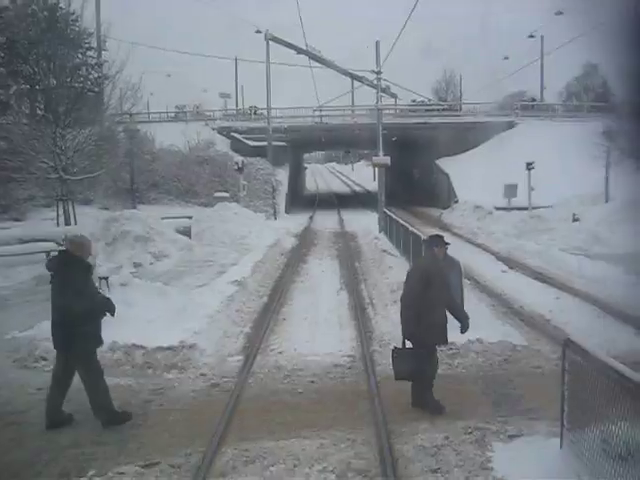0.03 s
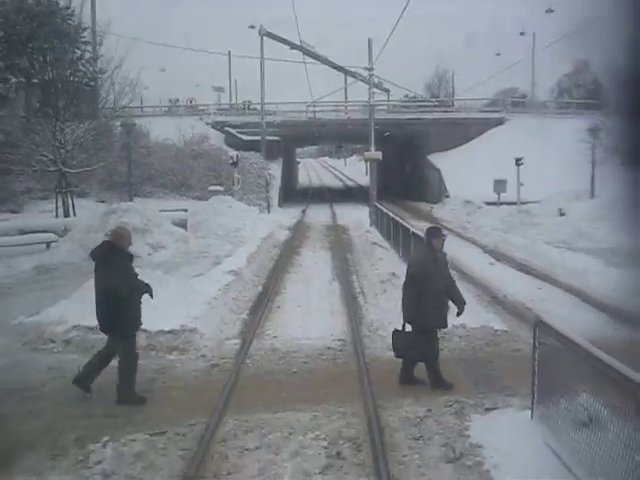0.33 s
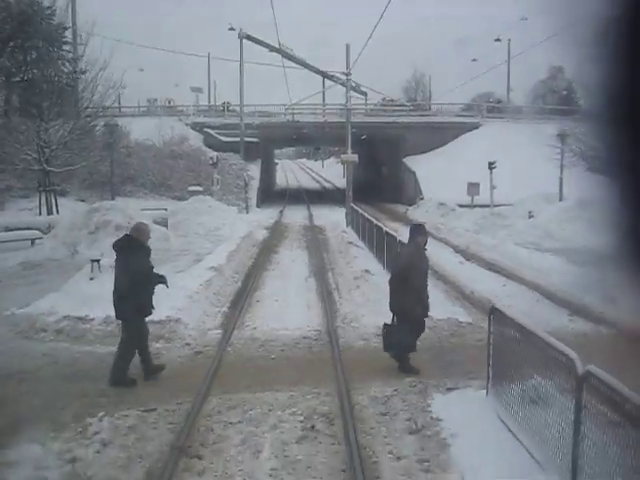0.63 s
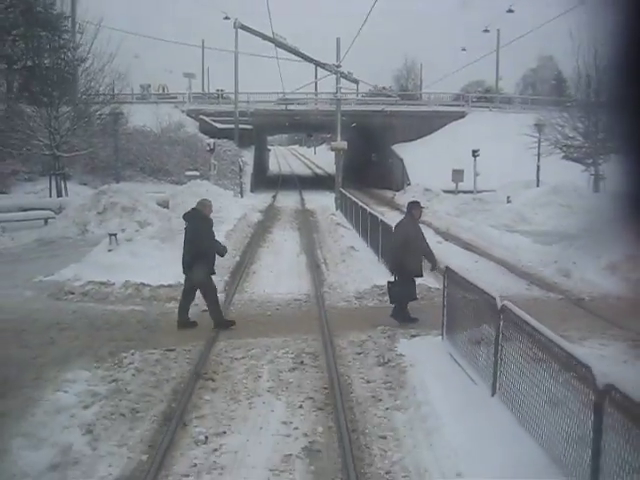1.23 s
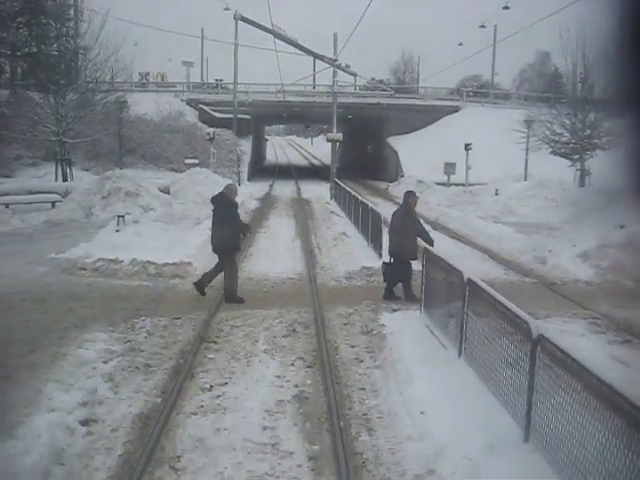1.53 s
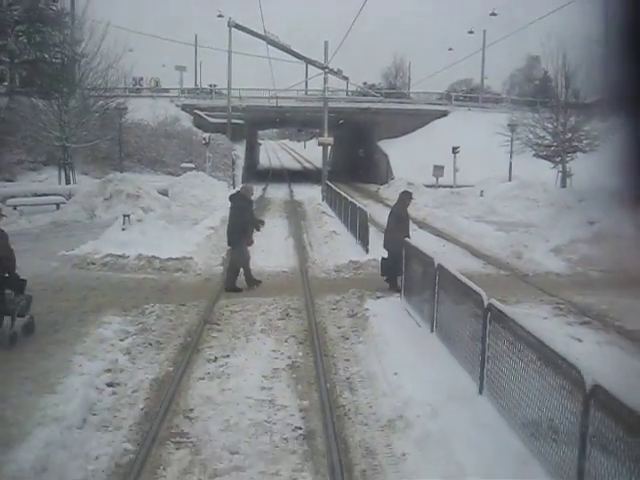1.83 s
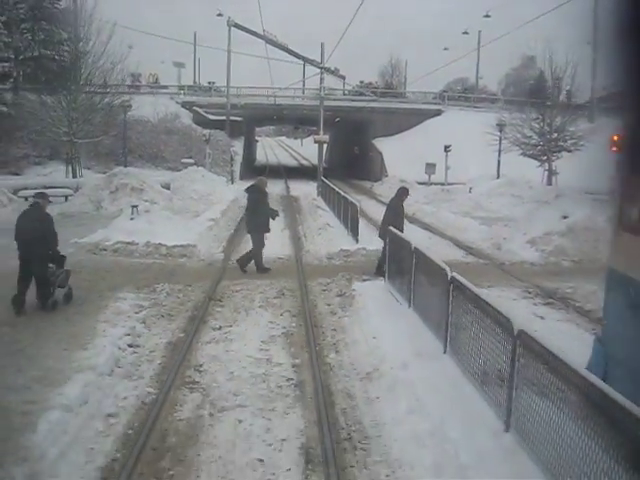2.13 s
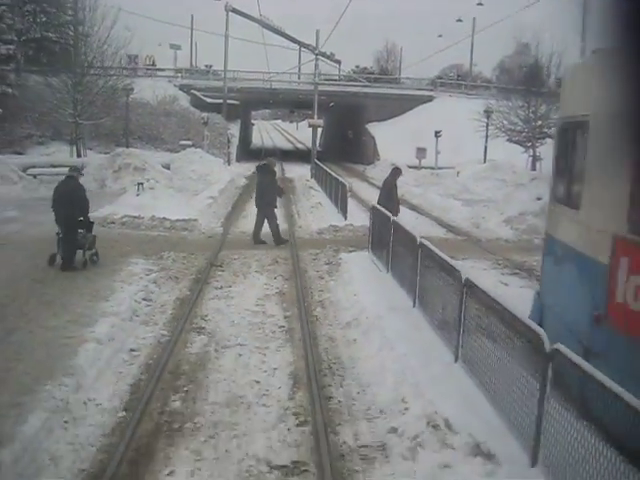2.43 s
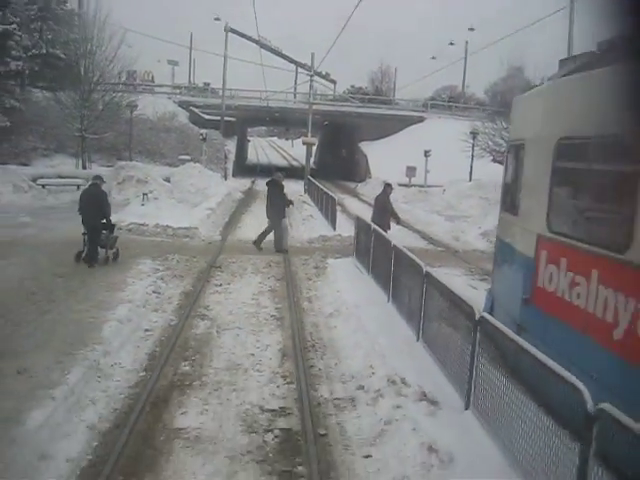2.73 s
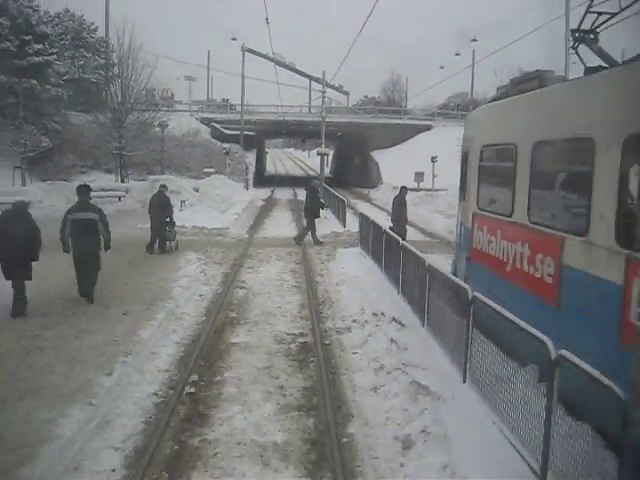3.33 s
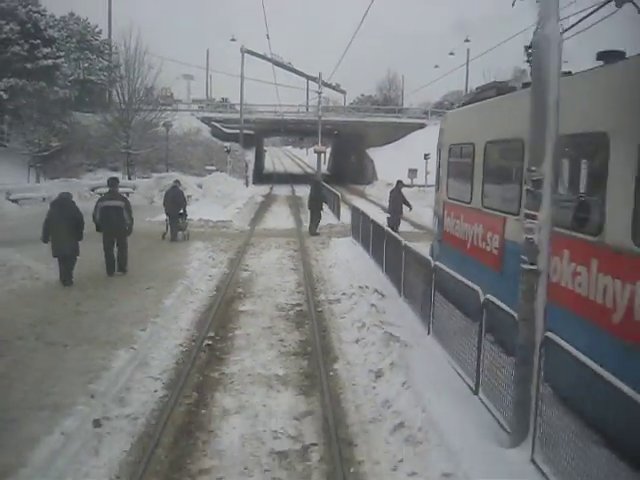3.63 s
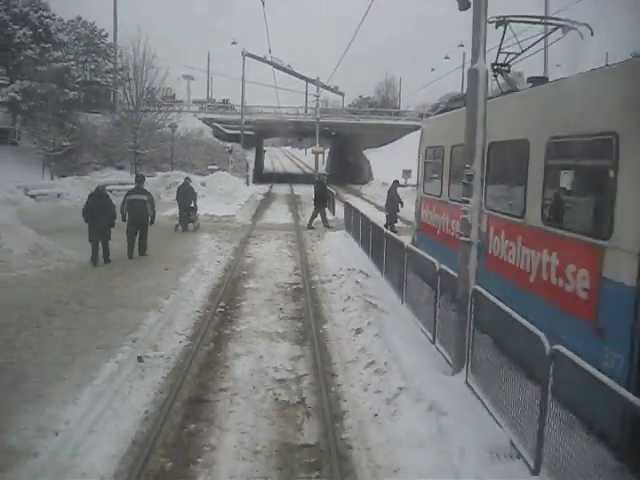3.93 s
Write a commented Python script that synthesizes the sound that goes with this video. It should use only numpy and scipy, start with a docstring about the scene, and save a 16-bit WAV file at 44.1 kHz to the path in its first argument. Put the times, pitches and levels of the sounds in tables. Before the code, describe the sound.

A tram rumbles along its tracks with a steady electric hum, heard from inside.

```python
"""Inside a tram cab

A tram rolls through a snowy town. Its wheels rumble through the body and excite its resonances, the electrics
hum steadily with a thin whine that fades early, and the air hisses. Loose cab fittings tick a few times, and a
wheel rubbing the rail sings faintly now and then. A faint hiss swells briefly as another tram comes by on the
next track."""
import sys
import numpy as np
from scipy import signal
from scipy.fft import rfft, irfft
from scipy.io import wavfile
from scipy.ndimage import map_coordinates

SR = 44100
rng = np.random.default_rng(int(sys.argv[2]) if len(sys.argv) > 2 else 0)


def unload_wav(signal):
    """Save mono or channel-first audio to the path in sys.argv[1] as 16-bit WAV at rate SR, clipped to [-1, 1]."""
    wavfile.write(
        sys.argv[1],
        SR,
        np.round(np.clip(np.atleast_2d(signal).T, -1, 1) * 32767).astype(np.int16),
    )


N = 176400

# Spectrum of the rolling noise. Each row: frequency in Hz, relative density in dB.
ROLLING_SPECTRUM = [(18, -25.5), (32, -9), (50, -3), (62, -7), (75, -2), (115, 2), (145, -6), (180, -1.5),
                    (240, -5), (335, -6.5), (365, -15.5), (415, -16.5), (460, -20), (700, -25.5),
                    (780, -26.5), (1300, -30.5), (2000, -41.5), (3500, -48.5), (6000, -55)]
# Course of the rolling noise. Each row: time in seconds, relative levels of rumble and roar in dB.
ROLLING_LEVELS = [(0, -25, -38), (.5, -22, -42), (.9, -23.5, -41), (1.35, -23.5, -43), (1.75, -25, -45),
                  (2.2, -26, -44.5), (2.45, -25.5, -43.5), (2.8, -26, -45.5), (3.3, -26.5, -45),
                  (3.5, -21, -43.5), (3.62, -27.5, -44), (4, -27, -44)]
# Resonances of body and running gear. Each row: frequency in Hz, half-width in Hz, relative level in dB.
BODY_MODES = [(77.65, 6.3, -4), (107.5, 3, -12), (242.3, 6.7, -12), (314.1, 10, -12.5), (399.3, 16, -19),
              (515.6, 6.5, -33.5), (614, 15, -21.5), (665.4, 18, -24)]
# Tones of the electrics. Each row: frequency in Hz, relative level in dB.
HUM_TONES = [(206.8, -0.48), (793, -42), (827.5, -32.5), (1330, -40), (1536, -42.5), (2069, -47),
             (2774, -45)]
# Course of the hum. Each row: time in seconds, gain in dB.
HUM_LEVELS = [(0, -22.5), (.8, -22), (1.4, -22), (1.7, -26), (2.2, -22.5), (2.8, -25), (3.3, -26),
              (4, -27.5)]
# Spectrum of the air noise. Each row: frequency in Hz, relative density in dB.
AIR_SPECTRUM = [(800, -7.5), (1800, -1.5), (2700, -1), (4000, -0.5), (5000, -2), (6000, -5)]
# Modes of the fittings. Each row: frequency in Hz, time to fall 60 dB in seconds, relative level in dB.
FITTING_MODES = [(645, 0.043, -4), (1144, 0.0086, 4), (1535, 0.0044, 6), (2050, 0.0087, -0.5),
                 (2550, 0.01, 0), (2970, 0.0082, -4), (4570, 0.0031, -3)]
# Ticks. Each row: start in seconds, gains of the low, middle and high modes in dB, crack level in dB.
FITTING_TICKS = [(.1340, -17, -18, -32, -29), (.2535, -39.5, -36, -43.5, -42),
                 (.2742, -53, -19.5, -21.5, -39), (1.1288, -27, -26, -28, -29.5)]
# Frequencies in Hz assigned to a tick's low, middle and high gains.
TICK_ANCHORS_HZ = [1800, 3000, 2900]
# Swells of the wheel's song. Each row: peak time in seconds, half-length in seconds, level in dB.
WHEEL_SWELLS = [(.35, 0.02, -38.5), (.83, 0.034, -39), (1.5, 0.059, -43.5), (1.87, 0.039, -40.5),
                (2.48, 0.011, -36), (3.19, 0.035, -42.5), (3.77, 0.067, -43)]
# Spectrum of the passing tram's hiss. Each row: frequency in Hz, relative density in dB.
PASSING_SPECTRUM = [(900, -3.5), (1700, -1), (2800, 0.5), (4000, 0), (5000, -2.5), (6000, -10)]
# Swells of that hiss. Each row: peak time in seconds, half-length in seconds, level in dB.
PASSING_SWELLS = [(2.2, .25, -58.5), (2.647, 0.012, -42), (2.693, .017, -43.5), (2.7, 0.15, -50),
                  (3.228, .19, -52)]


def undb(db):
    """Amplitude grows tenfold for every 20 dB."""
    return 10 ** (np.asarray(db) / 20)


def unit(x):
    """Normalisation to an rms of 1."""
    return x / np.sqrt(np.mean(x ** 2))


def curve(rows, column=1):
    """Linear interpolation of one table column over time."""
    rows = np.array(rows)
    return np.interp(np.arange(N) / SR, rows[:, 0], rows[:, column])


def walk(rate):
    """Smooth random modulation of rms 1, with `rate` new values a second."""
    levels = rng.standard_normal(1000)
    return unit(map_coordinates(levels, [np.arange(N) / SR * rate], order=2, mode="mirror"))


def colour(points, hz):
    """Gain of a spectral envelope, interpolated in dB over log frequency."""
    points = np.array(points)
    return undb(np.interp(np.log(hz), np.log(points[:, 0]), points[:, 1]))


def noise(shape):
    """Spectral shaping of white noise by a function of frequency, at rms 1."""
    hz = np.maximum(np.arange(N // 2 + 1) * SR / N, 1)
    return unit(irfft(rfft(rng.standard_normal(N)) * shape(hz), N))


def resonance(centre_hz, half_width_hz):
    """A randomly driven resonator responds in a narrow band about its natural frequency."""
    return noise(lambda hz: 1 / (1 + ((hz - centre_hz) / half_width_hz) ** 2))


def tone(hz, drift, rate):
    """Random frequency modulation makes the pitch of a sine of rms 1 wander."""
    cycles = np.cumsum(hz * (1 + drift * walk(rate))) / SR
    return np.sqrt(2) * np.sin(2 * np.pi * (cycles + rng.random()))


def swells(rows):
    """An amplitude envelope of Gaussian swells that add in power."""
    t = np.arange(N) / SR
    return np.sqrt(sum(undb(db) ** 2 * np.exp(-((t - at) / half) ** 2) for at, half, db in rows))


def rolling(panel_from_hz=167.5, roar_from_hz=456, jolt_db=0.93, flicker_db=0.5):
    """Rolling contact excites broadband vibration: three bands jolt together and flicker separately."""
    rumble_db, roar_db = curve(ROLLING_LEVELS, column=1), curve(ROLLING_LEVELS, column=2)
    panel_db = rumble_db.mean() + roar_db - roar_db.mean()  # rises and falls with the roar
    jolts = jolt_db * walk(27)
    below = lambda hz, edge: 1 / (1 + (hz / edge) ** 12)  # share of the power below an edge
    floor = lambda hz: below(hz, panel_from_hz)
    panels = lambda hz: below(hz, roar_from_hz) * (1 - floor(hz))
    rails = lambda hz: 1 - below(hz, roar_from_hz)
    out = np.zeros(N)
    for share, db in (floor, rumble_db - 2), (panels, panel_db - 2), (rails, roar_db + 2):
        band = noise(lambda hz: colour(ROLLING_SPECTRUM, hz) * np.sqrt(share(hz)))
        out += band * undb(db + jolts + flicker_db * walk(20))
    return out


def car_body():
    """Forced vibration: the body's resonances ring in proportion to the rumble that drives them."""
    modes = sum(undb(db) * resonance(hz, half_width) for hz, half_width, db in BODY_MODES)
    return modes * undb(curve(ROLLING_LEVELS))


def electrics(waver_db=0.18, drift=0.0013):
    """Superposition of a strong hum and thin whines, each wavering slightly in level and pitch."""
    main_hz = HUM_TONES[0][0]
    tones = sum(undb(db + waver_db * walk(10)) * tone(hz, drift * np.sqrt(main_hz / hz), rate=4.7)
                for hz, db in HUM_TONES)
    return tones * undb(curve(HUM_LEVELS))


def air(hiss_db=-51.5, ring_db=-59.5, fall_db_per_s=8):
    """Broadband air noise is heard as a steady hiss; beside it, a thin whine of the electrics near 2.8 kHz
    starts stronger and fades exponentially."""
    fade = undb(ring_db - fall_db_per_s * np.arange(N) / SR)
    ring = resonance(centre_hz=2780, half_width_hz=37) * fade
    return undb(hiss_db) * noise(lambda hz: colour(AIR_SPECTRUM, hz)) + ring


def fittings(crack_decay_s=0.0016, crack_cutoff_hz=3220):
    """Impact excitation: a loose fitting gives a tiny crack, then rings in damped modes."""
    out, t = np.zeros(N), np.arange(SR // 20) / SR
    lowpass = signal.butter(2, crack_cutoff_hz, fs=SR, output="sos")
    for at, low_db, middle_db, high_db, crack_db in FITTING_TICKS:
        balance = list(zip(TICK_ANCHORS_HZ, (low_db, middle_db, high_db)))
        ring = np.zeros(len(t))
        for k, (hz, t60, db) in enumerate(FITTING_MODES):
            amplitude = (-1) ** k * undb(db) * colour(balance, hz)
            ring += amplitude * np.exp(-np.log(1000) * t / t60) * np.sin(2 * np.pi * hz * t)
        crack = unit(signal.sosfilt(lowpass, rng.standard_normal(len(t)))) * np.exp(-t / crack_decay_s)
        start = int(at * SR)
        out[start:start + len(t)] += ring + undb(crack_db) * crack
    return out


def wheel_song(flutter_db=2.0):
    """Friction against the rail makes a wheel sing in short swells, with a rough flutter."""
    flutter = undb(flutter_db * walk(60))
    return swells(WHEEL_SWELLS) * unit(flutter * tone(hz=613.3, drift=0.01, rate=25))


def passing_tram():
    """Amplitude-modulated noise: a hiss swells and fades as the other tram comes by."""
    return swells(PASSING_SWELLS) * noise(lambda hz: colour(PASSING_SPECTRUM, hz))


def scene():
    """Superposition: the pressures of all sources in the cab add in one channel."""
    return (rolling() + car_body() + electrics() + air() + fittings() + wheel_song() + passing_tram())[None]


def record(dry, start_s=0.035, cutoff_hz=5450):
    """A gate opens after a moment of silence, and a steep low-pass filter removes the high treble."""
    gate = np.clip((np.arange(N) / SR - start_s) / 0.001, 0, 1)
    return signal.sosfilt(signal.butter(22, cutoff_hz, fs=SR, output="sos"), dry * gate)


dry = scene()
out = record(dry)
unload_wav(out)
```